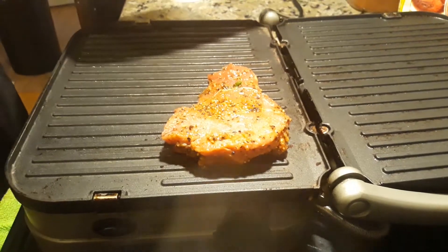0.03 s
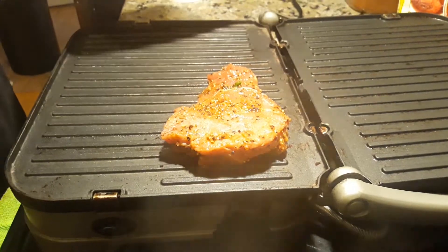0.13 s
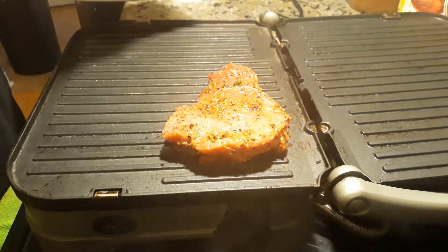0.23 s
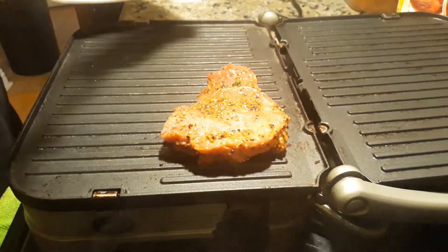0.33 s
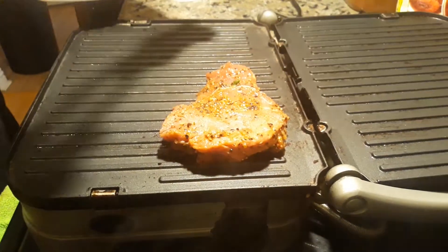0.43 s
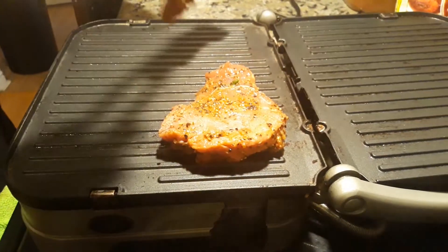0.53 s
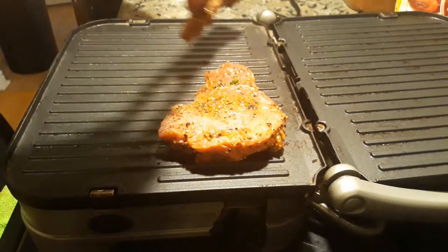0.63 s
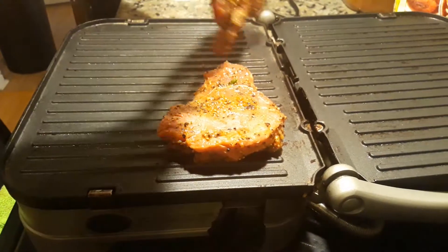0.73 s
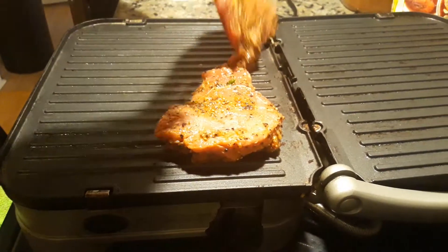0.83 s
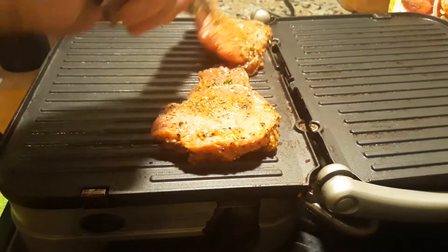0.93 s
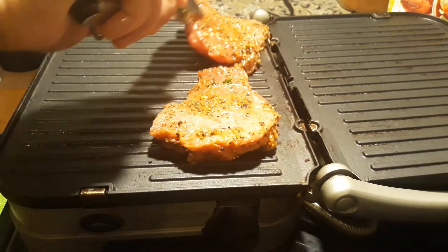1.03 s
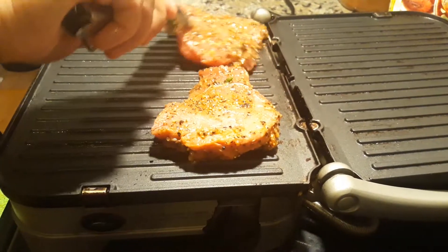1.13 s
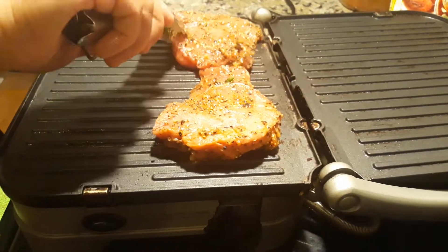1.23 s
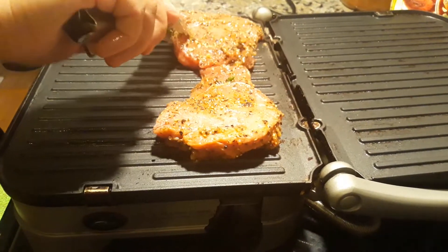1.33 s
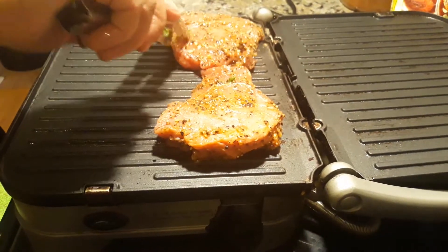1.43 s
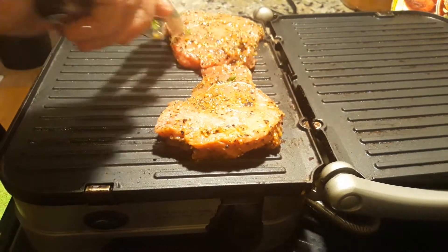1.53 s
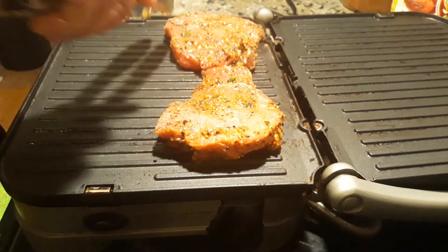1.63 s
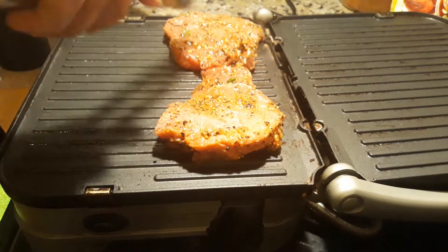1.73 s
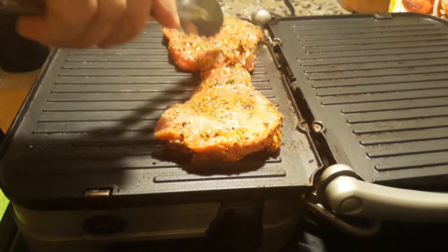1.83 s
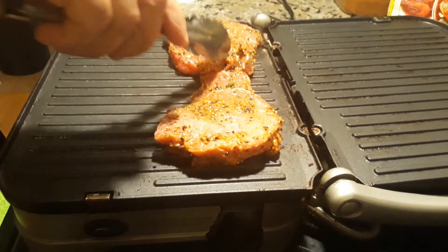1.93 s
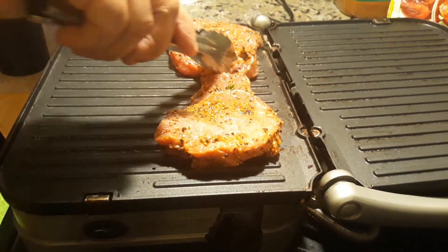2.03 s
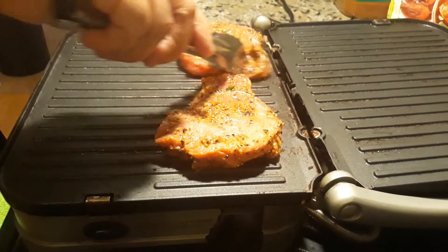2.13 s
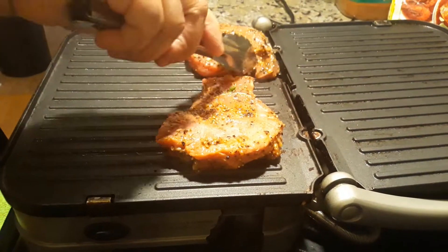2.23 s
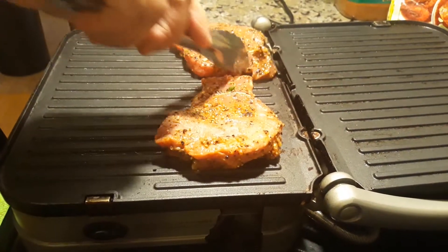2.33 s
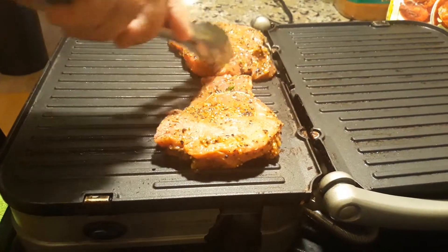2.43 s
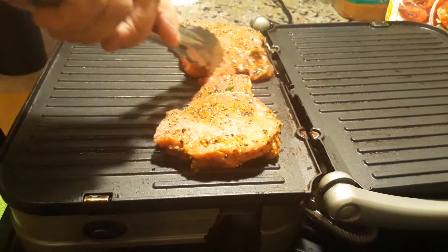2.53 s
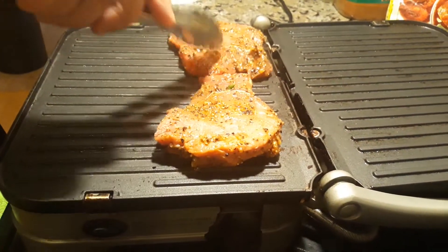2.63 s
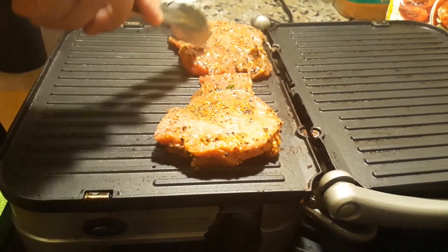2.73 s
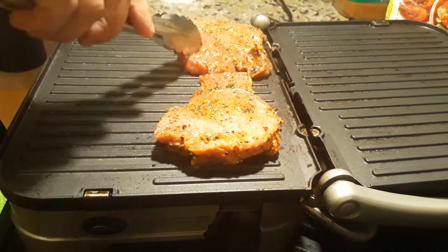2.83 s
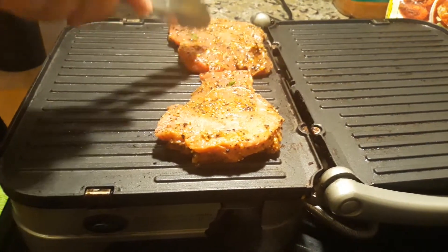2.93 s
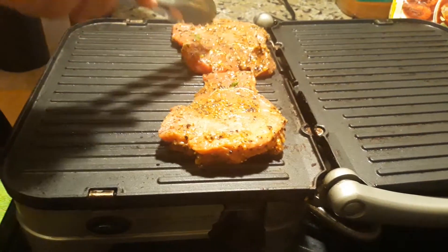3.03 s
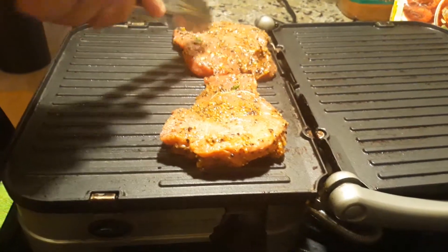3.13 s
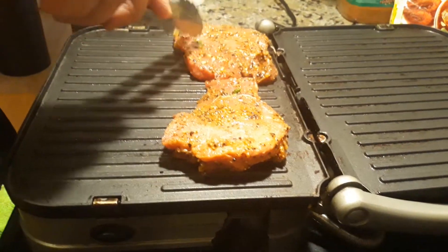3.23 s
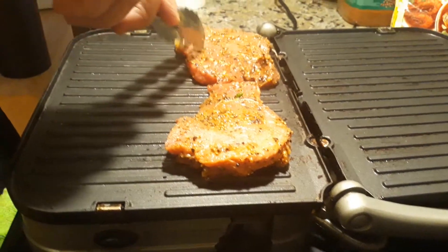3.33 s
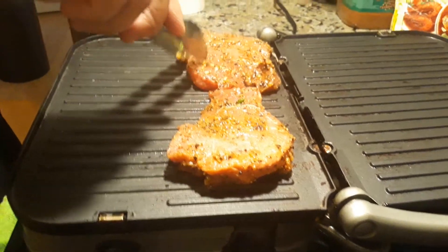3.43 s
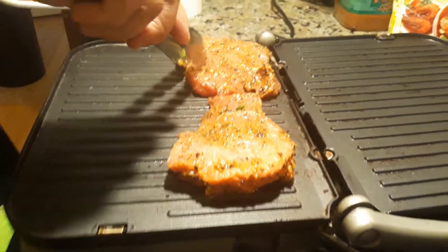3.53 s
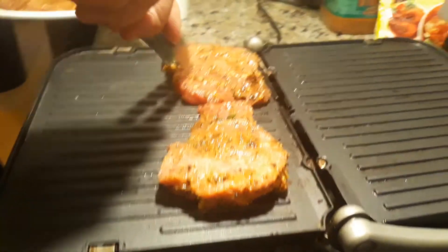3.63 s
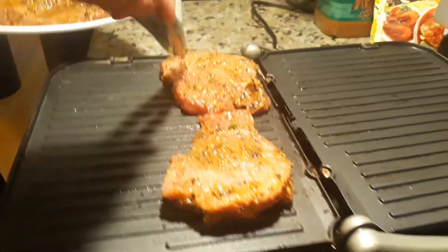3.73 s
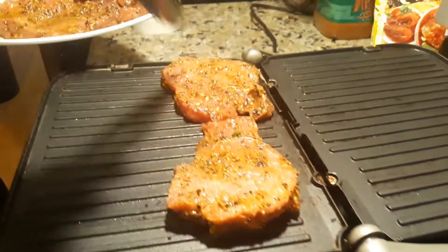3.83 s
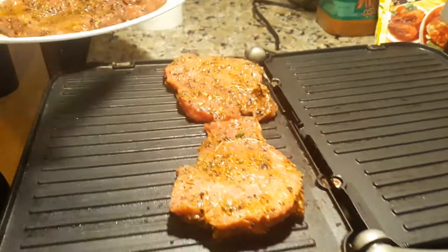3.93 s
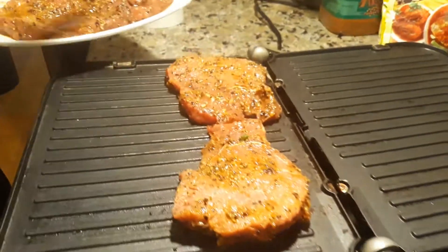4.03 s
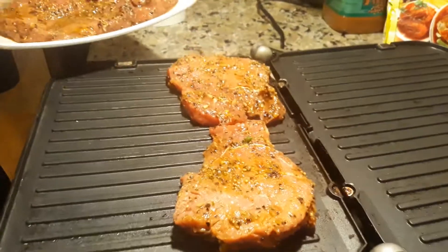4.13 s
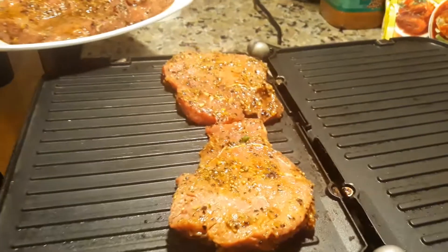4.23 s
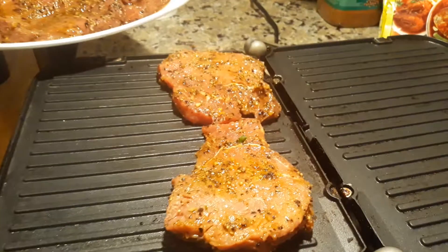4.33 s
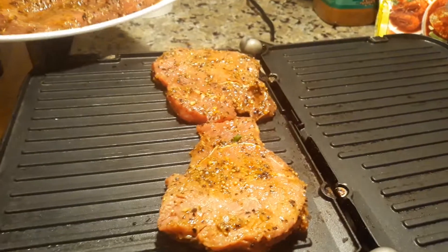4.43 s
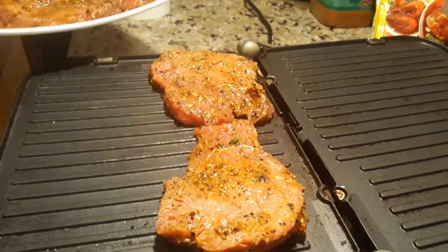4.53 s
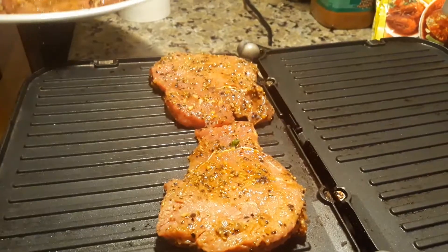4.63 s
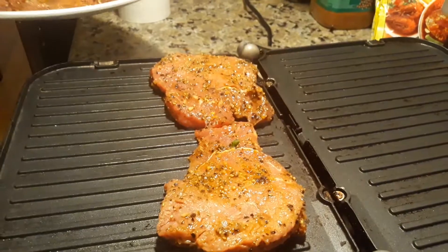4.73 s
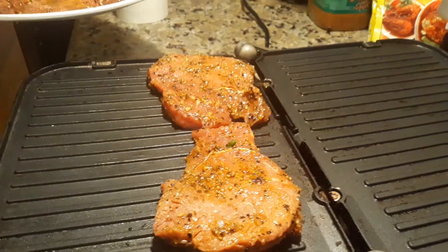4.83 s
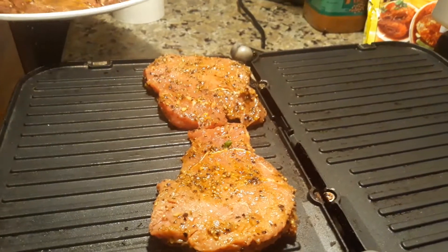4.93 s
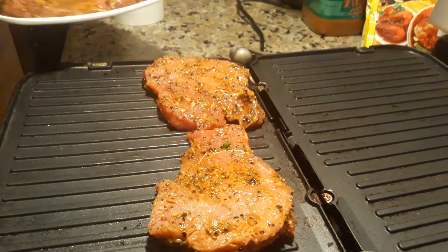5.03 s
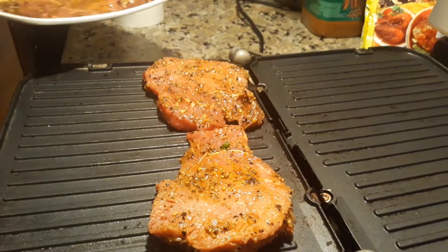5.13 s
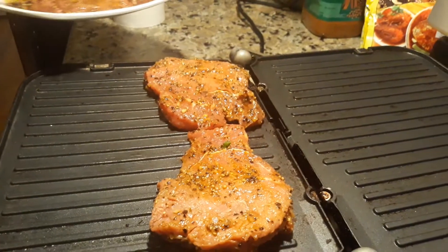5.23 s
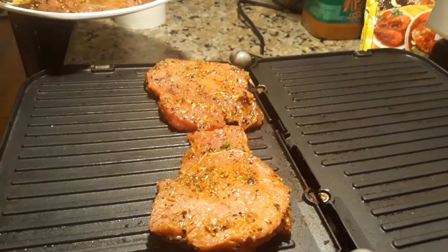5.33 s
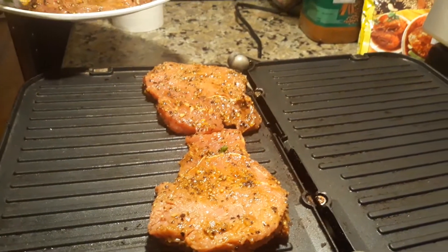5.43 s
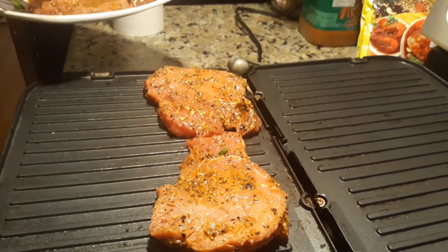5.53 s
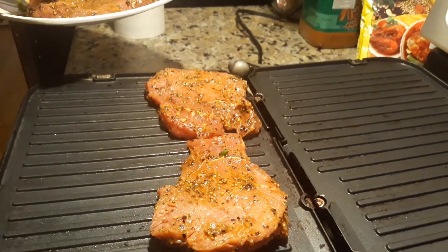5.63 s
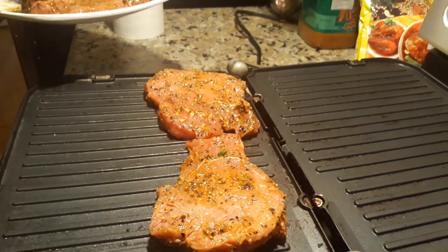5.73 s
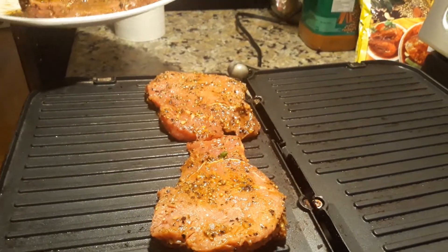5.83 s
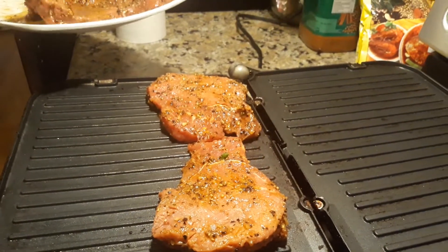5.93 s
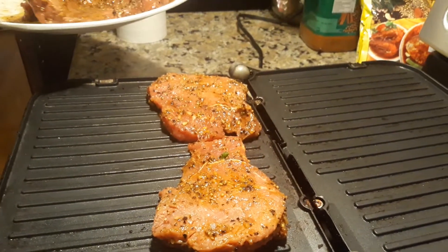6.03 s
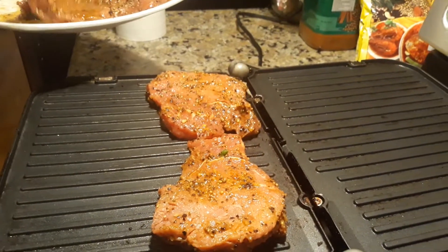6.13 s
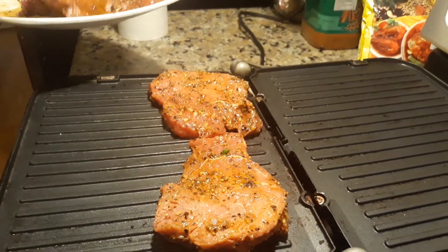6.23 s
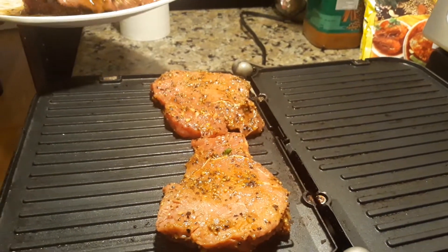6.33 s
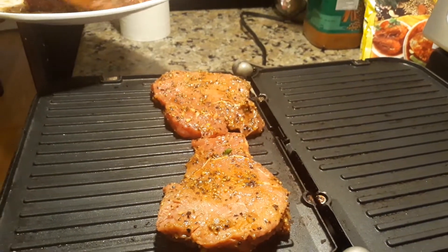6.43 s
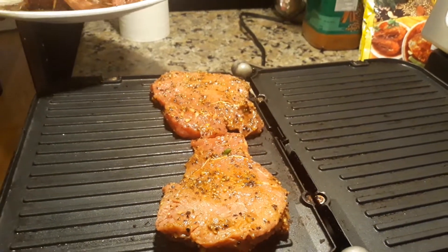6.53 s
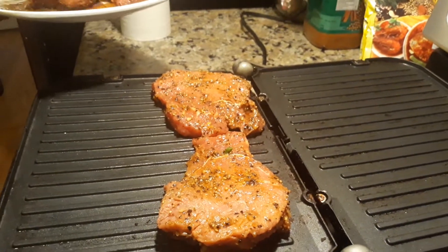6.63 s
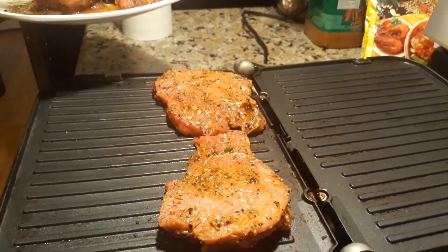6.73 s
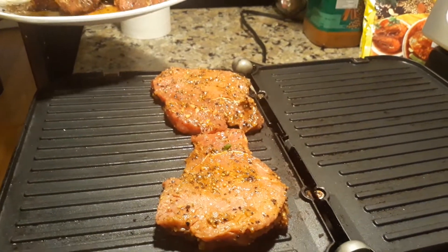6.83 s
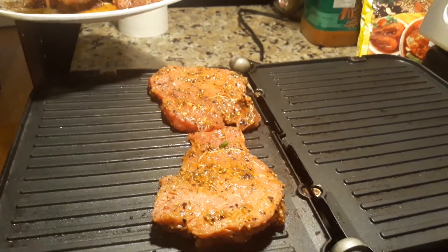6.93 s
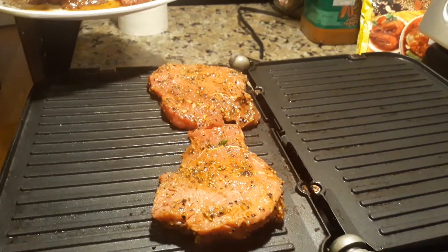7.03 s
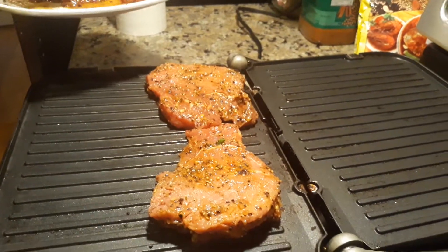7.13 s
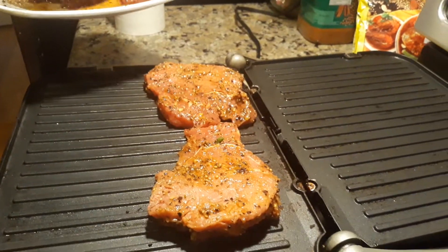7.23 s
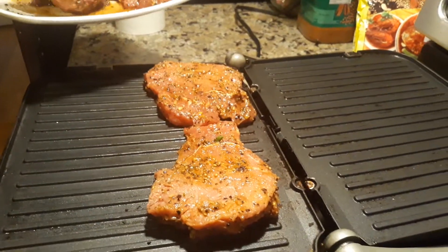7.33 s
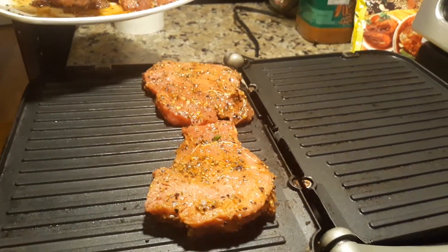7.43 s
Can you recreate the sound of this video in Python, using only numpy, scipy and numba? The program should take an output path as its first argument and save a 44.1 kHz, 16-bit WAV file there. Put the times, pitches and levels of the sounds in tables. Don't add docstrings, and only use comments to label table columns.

```python
import sys
import numpy as np
from scipy import signal
from scipy.fft import rfft, irfft
from scipy.io import wavfile
from scipy.ndimage import uniform_filter1d
from numba import njit

SR = 44100
rng = np.random.default_rng(int(sys.argv[2]) if len(sys.argv) > 2 else 0)


def pcm_store(signal):
    levels = np.round(np.clip(np.atleast_2d(signal), -1, 1) * 32767)
    wavfile.write(sys.argv[1], SR, levels.astype(np.int16).T)


def magnitude_from_level(level_db):
    exponent = np.asarray(level_db, float) / 20
    return 10 ** exponent


N = 329868
FFT_SIZE = 81 * 4096
HZ = np.maximum(np.arange(FFT_SIZE // 2 + 1) * SR / FFT_SIZE, 1)
TIME_S = np.arange(N) / SR
TICKS_S = np.arange(0, N / SR + .01, .002)


def set_level(x, rms_db):
    return x * magnitude_from_level(rms_db) / np.sqrt(np.mean(x ** 2))


def across(points):
    hz, value = np.transpose(points)
    return np.interp(np.log(HZ), np.log(np.maximum(hz, 1)), value)


def colour(points, peaks):
    lift_db = sum(db / (1 + (2 * (HZ - hz) / width_hz) ** 2) for hz, width_hz, db in peaks)
    return magnitude_from_level(across(points) + lift_db)


def ramp(edges_s, values):
    return np.interp(TICKS_S, edges_s, values)


def smooth(db):
    return np.interp(TIME_S, TICKS_S, magnitude_from_level(db))


def walk(rate_hz):
    k = int(500 / rate_hz)
    held = np.repeat(rng.standard_normal(len(TICKS_S) // 8), k)[:len(TICKS_S)]
    return 0.78 * uniform_filter1d(uniform_filter1d(held, k), k)


# (frequency [Hz], likeness [0-1])
PORT_LIKENESS = [(25, .997), (120, .985), (300, .91), (750, .85), (900, .6), (1300, .82), (1800, .33),
                 (2500, .75), (3300, .28), (4500, .45), (8000, .27), (16000, .3)]
# (frequency [Hz], lead [rad])
PORT_LEAD = [(30, 0), (900, -.05), (1350, 1.2), (1800, 0), (2700, .4), (3300, .5), (4000, 2.3), (6000, 4),
             (8000, 5.2), (12000, 7.4), (16000, 9)]
# (frequency [Hz], left minus right [dB])
PORT_LEAN = [(60, 0), (110, -2.5), (200, 0), (380, 2), (700, 2), (1290, 0.5), (2380, 2), (3000, 0.5),
             (4200, -3), (5500, -1.5), (8120, -1), (15000, -0.5)]


def ports(draw):
    shared, left, right = (rfft(draw(), FFT_SIZE) for _ in range(3))
    like = np.clip(across(PORT_LIKENESS), 0, 1)
    turn = np.exp(.5j * across(PORT_LEAD))
    direct = np.sqrt(like) * shared * np.array([turn, turn.conj()])
    scattered = np.sqrt(1 - like) * np.array([left, right])
    return (direct + scattered) * magnitude_from_level(np.outer([.5, -.5], across(PORT_LEAN)))


# (time [s], level [dB])
BOILING = [(0, -28), (.25, -28.5), (.98, -26), (1.2, -24.5), (1.3, -22), (1.55, -22.5), (1.83, -24),
           (2.3, -26), (3.3, -26), (3.75, -26.5), (4.3, -26.5), (5.0, -27.5), (6.0, -28.5), (6.9, -30),
           (7.3, -30), (7.48, -29.5)]


def boiling_db():
    return ramp(*np.transpose(BOILING))


@njit
def whistles(start, step, length, size, total):
    out = np.zeros(total)
    for k in range(len(start)):
        z, turn = size[k] + 0j, np.exp(1j * step[k])
        for i in range(min(length[k], total - start[k])):
            u = i / length[k]
            out[start[k] + i] += z.imag * u * (1 - u) * (1 - u)
            z *= turn
    return out


def bursts():
    pop_share, pop_spread_db = .35, 2.5
    jet_s, jet_spread_db, jet_db = 0.016, 2.5, -6
    happens, sign, size = rng.random((3, N))
    pop_size = magnitude_from_level(np.minimum(-pop_spread_db * np.log(1 - size), 14))
    pops = (happens < pop_share) * np.sign(sign - .5) * pop_size

    when, pitch, span, strength = rng.random((N // 48, 4)).T
    jet_hz = 1900 + 14000 * pitch
    jet_size = magnitude_from_level(np.minimum(-jet_spread_db * np.log(1 - strength), 9))
    start = (when * N).astype(int)
    length = (jet_s * SR * (0.5 + span)).astype(int)
    jets = whistles(start, 2 * np.pi * jet_hz / SR, length, jet_size, N)
    return set_level(pops, 0) + set_level(jets, jet_db)


# (frequency [Hz], density [dB per Hz])
SIZZLE_COLOUR = [(470, -39), (800, -17.5), (896, -21), (1050, -15.5), (1860, -11), (2010, -9), (2660, -5),
                 (5580, 0), (7300, -2), (8550, -10), (10700, -8.5), (12600, -3.5), (14000, -5.5),
                 (15700, -2.5)]
# (frequency [Hz], width [Hz], lift [dB])
PLATE_RIDGES = [(1010.5, 62, 11), (1960, 29, 3.5), (2128, 19, 6.5), (2415, 27, 4.5), (2653, 32, 6.5),
                (3240, 200, 1), (4710, 84, 5), (7130, 640, 4.5), (15171, 55, -2)]
# (time [s], level [dB])
STEAM_PUFFS = [(.05, 0.5), (2.13, -0.5), (2.32, -2), (2.47, -1), (2.68, -2.5), (3.64, -3), (3.98, 0.5),
               (4.37, 2), (4.48, -1.5), (4.58, 1), (4.9, 1.5), (5.33, -1.5), (5.52, 0.5), (6.35, -1),
               (6.68, 1.5), (7.07, -2.5), (7.32, -3)]
# (frequency [Hz], harder boiling [dB per dB], under arm [dB], phone near [dB])
BUBBLE_RULES = [(1100, 0.4, -4, 3), (1600, 0, -1.5, 2), (2100, 0.17, -3.5, -1.5), (2700, 0.12, -1, .5),
                (4530, 0.19, -1.5, -1), (6960, 0.01, -0.5, 2), (9500, -0.06, -2, -3), (13000, -0.32, 0, .5)]
# (frequency [Hz], share [1])
ARM_SHADE = [(600, 0.7), (2200, -1.1), (2900, 0.4), (4200, 1.2), (5600, 0.5), (6800, 1.1), (8500, -0.2),
             (10500, 2), (13000, 0.23), (15000, 0.9)]
ARM_S, ARM_PAN_DB = (.3, .8, 1.35, 1.95), -6.5
MOVE_IN_S = (3, 4.5)
PUFF_S = 0.022


def sizzle():
    puff_db = sum(db * np.exp(-((TICKS_S - s) / PUFF_S) ** 2) for s, db in STEAM_PUFFS)
    boil_db = boiling_db()
    steam_db = boil_db + puff_db
    excess_db = steam_db - np.median(boil_db)
    arm, near = ramp(ARM_S, [0, 1, 1, 0]), ramp(MOVE_IN_S, [-.5, .5])
    spectra = ports(bursts) * colour(SIZZLE_COLOUR, PLATE_RIDGES)
    middle = irfft(spectra.mean(axis=0) * (HZ > 2500) * (HZ < 8000), FFT_SIZE)
    reference = np.sqrt(np.mean(middle ** 2))
    size_hz, *rules = np.transpose(BUBBLE_RULES)
    shade_hz, shade = np.transpose(ARM_SHADE)
    out, surge, patch = 0, walk(14), walk(14)
    for hz in 800 * 2 ** (np.arange(14) / 3):
        window = np.cos(np.pi / 2 * np.clip(3 * np.log2(HZ / hz), -1, 1)) ** 2
        harder, shaded, nearer = (np.interp(np.log(hz), np.log(size_hz), rule) for rule in rules)
        db = steam_db + harder * excess_db + shaded * arm + nearer * near
        patch = 0.74 * patch + 0.38 * walk(14)
        db = db + 0.23 * surge + 0.55 * patch + 0.86 * walk(28)
        lean_db = np.interp(hz, shade_hz, shade) * ARM_PAN_DB * arm / 2
        band = irfft(spectra * window, FFT_SIZE)[:, :N]
        out = out + band * [smooth(db + lean_db), smooth(db - lean_db)]
    return out / reference


# (time [s], peak [dB], frequency [Hz], left minus right [dB])
FAT_SPITS = [(0.3496, -21, 7420, -6), (0.4913, -14, 6560, -1.5), (0.8131, -14, 6520, -5.5),
             (1.3324, -22, 5830, -8), (1.8394, -12, 6920, 0), (2.1284, -12, 6840, -10),
             (2.5144, -19, 3240, 3), (3.6601, -18, 7090, -3), (3.8874, -14, 5490, 3),
             (3.9134, -14, 7270, 2), (3.9364, -11, 7200, 3), (3.987, -10, 4680, -1.5),
             (3.993, -12, 7200, -2.0), (4.3515, -17, 6200, 2), (4.4962, -16, 7100, 1),
             (4.5514, -16, 4950, -1.5), (4.89, -16, 7210, 1), (5.8644, -14, 7430, -3)]


def spits():
    out, t = np.zeros((2, N + SR)), np.arange(400) / SR
    decay = np.exp(-t / 0.0029)
    for s, db, hz, pan_db in FAT_SPITS:
        ring = np.sin(2 * np.pi * hz * t) + 0.64 * rng.standard_normal((2, len(t)))
        port_db = db - 5.0 + np.array([[.5], [-.5]]) * pan_db
        start = int(s * SR)
        out[:, start:start + len(t)] += ring * decay * magnitude_from_level(port_db)
    return signal.sosfilt(signal.butter(4, 2200, "highpass", fs=SR, output="sos"), out[:, :N])


GROOVE_OPENS_S, GROOVE_SAGS_S = (1.4, 1.58), (3.9, 4.2)
GROOVE_DB = (-59.5, -45.5, -50)
GROOVE_HZ, GROOVE_WIDTH_HZ = (1310, 1250), 85
GROOVE_FLUTTER_DB = 1.8


def groove():
    quiet_db, blow_db, late_db = GROOVE_DB
    db = ramp(GROOVE_OPENS_S + GROOVE_SAGS_S, [quiet_db, blow_db, blow_db, late_db])
    slow = uniform_filter1d(rng.standard_normal((2, 2, N)), int(SR / GROOVE_WIDTH_HZ))
    phase = 2 * np.pi * np.cumsum(np.interp(TIME_S, GROOVE_SAGS_S, GROOVE_HZ)) / SR
    mid, side = slow[0] * np.cos(phase) + slow[1] * np.sin(phase)
    hum = set_level(mid + np.outer([.35, -.35], side), 0)
    return hum * smooth(db + GROOVE_FLUTTER_DB * walk(9.5))


# (time [s], peak [dB], frequency [Hz], t60 [s])
COUNTER_KNOCKS = [
    (.817, -37, 350, 0.044),
    (.82, -36, 580, .04),
    (0.834, -37, 150, 0.059),
    (3.029, -33, 423, 0.032),
    (5.391, -37, 494, .06),
    (6.42, -24, 480, 0.022),
    (6.424, -33, 590, 0.07),
    (6.436, -33, 620, 0.05),
    (6.459, -39, 390, .08),
    (6.482, -39, 556, 0.055),
]


def knocks():
    out, t = np.zeros(N + SR), np.arange(SR // 4) / SR
    modes = [(.72, -7.5), (1, 7.5), (1.25, -7), (2.4, 2)]  # (frequency ratio [1], level [dB])
    contact = 1 - np.exp(-t / 0.0015)
    for s, db, hz, t60_s in COUNTER_KNOCKS:
        ring = sum(magnitude_from_level(g) * np.sin(2 * np.pi * r * hz * t) for r, g in modes)
        thud = uniform_filter1d(rng.standard_normal(len(t)), 25) * magnitude_from_level(-10)
        decay = np.exp(-np.log(1000) * t / max(t60_s, .01))
        start = int(s * SR)
        out[start:start + len(t)] += magnitude_from_level(db - 3.5) * (ring + thud) * contact * decay
    return signal.sosfilt(signal.butter(2, 110, "highpass", fs=SR, output="sos"), out[:N])


# (frequency [Hz], density [dB per Hz])
GRIP_SPECTRUM = [(30, -33), (60, -17), (95, -18), (120, -2.5), (170, -2), (215, -4), (280, -13), (500, -60)]
GRIP_S, GRIP_DB, GRIP_FADE_DB = (.3, .55, 1.5, 2.1), -50, -20


def grip():
    spectrum = rfft(rng.standard_normal(N), FFT_SIZE) * colour(GRIP_SPECTRUM, DUCT_PEAKS)
    low = irfft(spectrum, FFT_SIZE)[:N]
    db = np.interp(TICKS_S, GRIP_S, [GRIP_FADE_DB, 0, 0, GRIP_FADE_DB], left=-50, right=-50)
    return set_level(low, GRIP_DB) * smooth(db + 1.8 * walk(14.4))


# (frequency [Hz], density [dB per Hz])
FAN_COLOUR = [(15, -45), (25, -30), (91, -28), (108, -23), (160, -8), (202, -7.5), (377, -7), (659, -6.5),
              (760, -2.5), (850, -17), (1000, -9.5), (1400, -17.5), (2080, -34), (3520, -90)]
# (frequency [Hz], width [Hz], lift [dB])
DUCT_PEAKS = [(59, 8, 7.5), (117.8, 6, 10.5), (202.5, 14, 5.5), (345, 16, 5), (569, 36, 7), (706, 28, 5.5)]
FAN_DB = -46.5
FAN_DUCK_DB_PER_DB = -0.31


def fan():
    spectra = ports(lambda: rng.standard_normal(N)) * colour(FAN_COLOUR, DUCT_PEAKS)
    air = irfft(spectra, FFT_SIZE)[:, :N]
    boil_db = boiling_db()
    duck_db = FAN_DUCK_DB_PER_DB * (boil_db - np.median(boil_db))
    return set_level(air, FAN_DB) * smooth(1.5 * walk(9.3) + duck_db)


def scene():
    return sizzle() + spits() + groove() + knocks() + grip() + fan()


def band_limit(x):
    return signal.sosfilt(signal.butter(12, 15720, fs=SR, output="sos"), x)


def record(dry):
    return band_limit(dry)


dry = scene()
out = record(dry)
pcm_store(out)
```